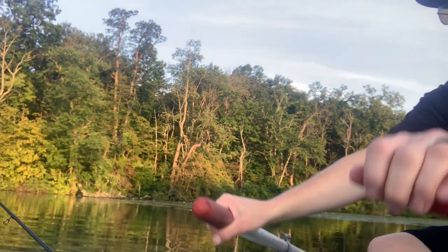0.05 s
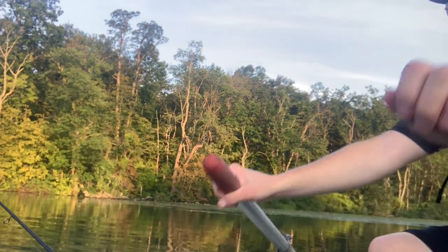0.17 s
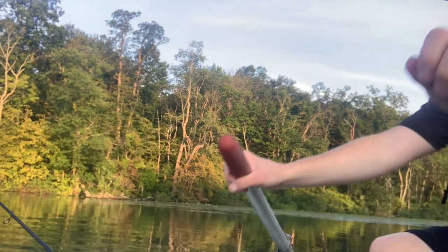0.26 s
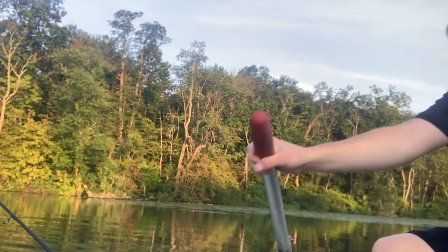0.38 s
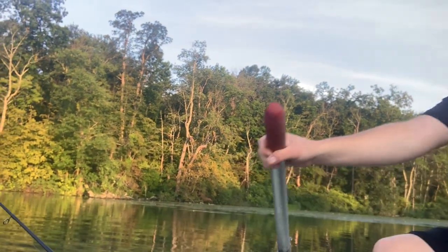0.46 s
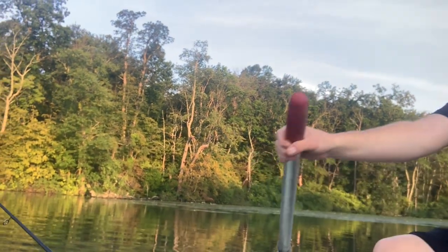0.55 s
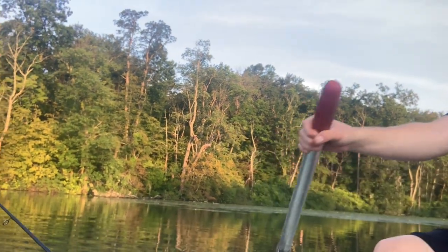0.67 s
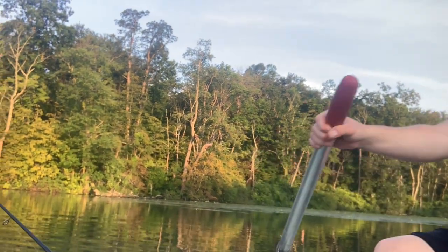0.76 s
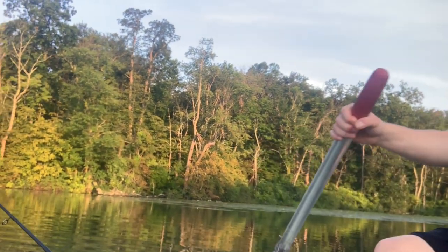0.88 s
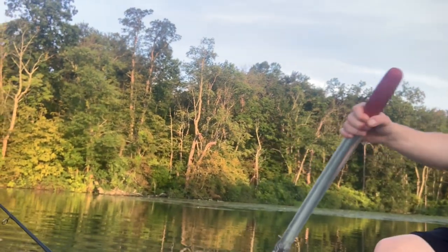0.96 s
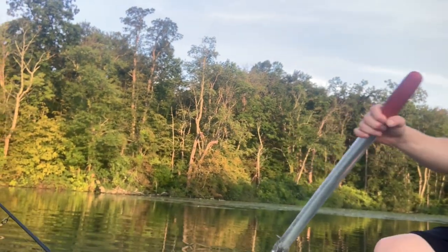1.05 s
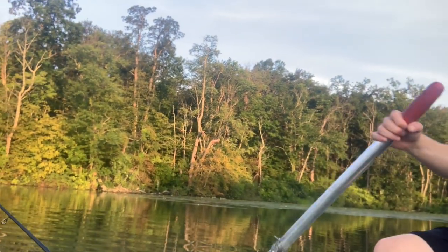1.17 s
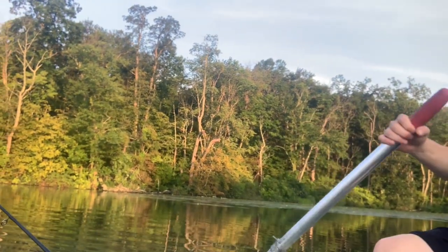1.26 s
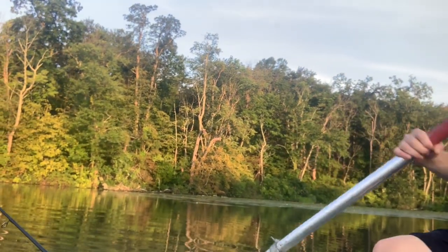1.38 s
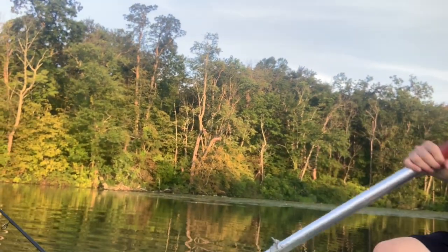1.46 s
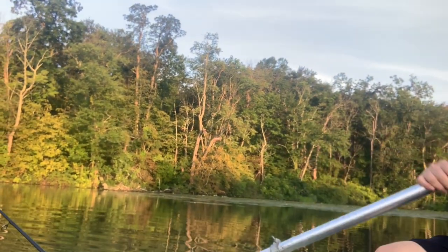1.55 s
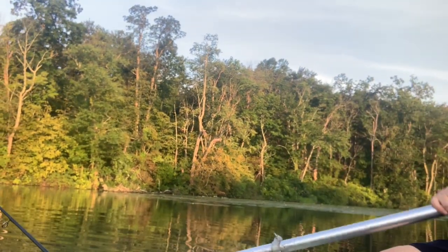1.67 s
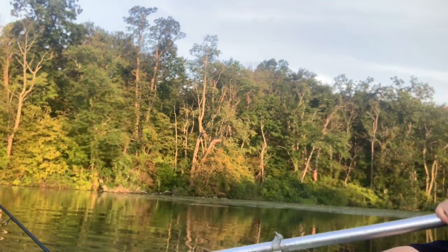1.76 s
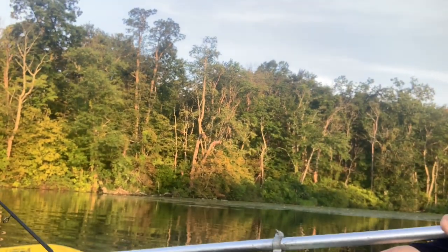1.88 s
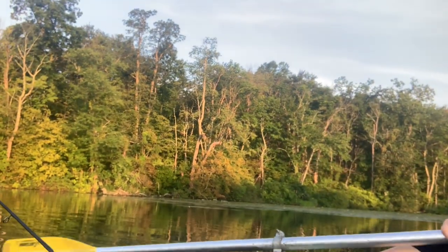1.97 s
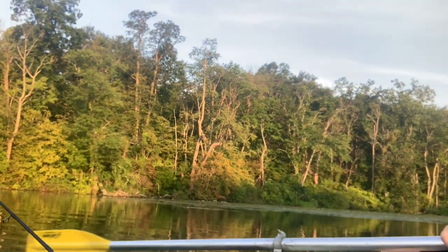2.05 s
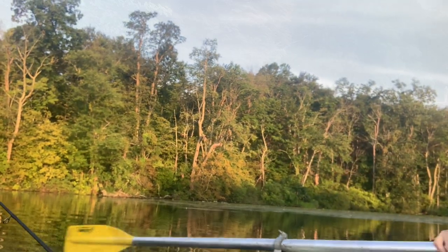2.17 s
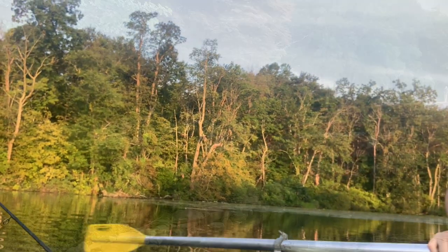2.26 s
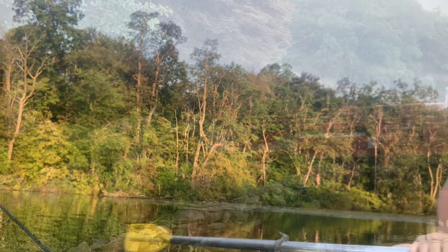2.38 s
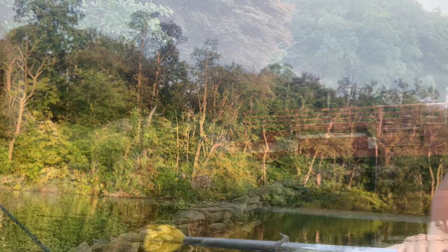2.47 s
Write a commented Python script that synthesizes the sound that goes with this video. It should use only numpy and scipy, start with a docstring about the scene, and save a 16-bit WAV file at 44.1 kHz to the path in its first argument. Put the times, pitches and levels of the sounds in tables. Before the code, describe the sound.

Oars grind and knock in their locks through one stroke, heard from aboard a small boat over a low wash. A light splash and knock come at 0.2 seconds, then dull thumps and a short hollow hull boom at 0.6. Metal fittings clack from 1.2 to 1.6 seconds. The lifted blade drips and trickles from 1.7 to 2, and another knock lands near 2.5. Distant insects hiss faintly throughout.

```python
"""Low wash under a small rowing boat, then one oar stroke, heard from on board on a calm lake.
The oars grind and knock in their locks and set the hollow hull booming. The metal fittings clack
as the stroke ends, then the lifted blade drips, each drop trapping a ringing bubble.
Insects hiss on the shore."""
import sys
import numpy as np
from scipy import signal
from scipy.fft import rfft, irfft, next_fast_len
from scipy.io import wavfile
from scipy.ndimage import map_coordinates

SR = 44100
rng = np.random.default_rng(int(sys.argv[2]) if len(sys.argv) > 2 else 0)


def wrap_up_sound(samples):
    """Save the sound to the file named by the first command line argument, as 16-bit audio."""
    columns = np.atleast_2d(samples).T
    # keep every value between -1 and 1, then stretch to whole-number steps
    tamed = np.clip(columns, -1, 1)
    steps = np.round(tamed * 32767).astype(np.int16)
    wavfile.write(sys.argv[1], SR, steps)


N = 110250  # 2.5 s


def amp(db):
    """Decibels to gain."""
    return 10 ** (np.asarray(db) / 20)


def unit_rms(x):
    """Scale to rms 1."""
    return x / np.sqrt(np.mean(x ** 2) + 1e-20)


def curve_at(points, hz):
    """Interpolate (Hz, value) points on a log frequency axis."""
    point_hz, values = np.transpose(points)
    return np.interp(np.log(hz + 1), np.log(point_hz + 1), values)


def envelope(points):
    """Gain per sample from (s, dB) points."""
    return amp(np.interp(np.arange(N) / SR, *np.transpose(points)))


def filtered(x, response):
    """Apply a gain given as a function of Hz."""
    n = x.shape[-1]
    n_fft = next_fast_len(n + 8192)
    return irfft(rfft(x, n_fft) * response(np.fft.rfftfreq(n_fft, 1 / SR)), n_fft)[..., :n]


def lowpass(x, cut_hz, slope):
    """Zero-phase low-pass, falling 6 * slope dB per octave."""
    return filtered(x, lambda hz: 1 / (1 + (hz / cut_hz) ** slope))


def add(out, start_s, sound):
    """Mix a sound in at start_s."""
    i = max(0, min(N - 1, round(start_s * SR)))
    out[:, i:i + sound.shape[-1]] += sound[..., :N - i]


# Each row: frequency in Hz, left-right coherence from 0 to 1.
COHERENCE = [(60, 0.92), (150, 0.89), (290, 0.81), (640, 0.81), (1400, 0.037), (5500, 0.017), (7500, 0.97),
             (15000, 1)]
def width_rad(hz):
    """Mid-side angle that gives the coherence at hz."""
    return np.arccos(np.clip(curve_at(COHERENCE, hz), -1, 1)) / 2


def spread(pair, spectrum):
    """Colour two unrelated signals and blend them to stereo at rms 1."""
    blend = lambda hz: [np.cos(width_rad(hz)), np.sin(width_rad(hz))]
    mid, side = filtered(pair, lambda hz: amp(curve_at(spectrum, hz)) * blend(hz))
    return unit_rms(np.array([mid + side, mid - side]))


def noise(spectrum, n=N):
    """Coloured stereo noise at rms 1."""
    return spread(rng.standard_normal((2, n)), spectrum)


def ring(modes, t, scatter_db):
    """Struck (Hz, dB, T60 s) modes, each shifted in phase between the ears by up to a quarter cycle."""
    out = np.zeros((2, len(t)))
    for k, (hz, db, t60_s) in enumerate(modes):
        skew_rad = (-1) ** k * width_rad(hz) * np.array([[1], [-1]])
        decay = amp(db + scatter_db * rng.standard_normal() - 60 * t / t60_s)
        out += decay * np.sin(2 * np.pi * hz * t + skew_rad)
    return out


# Each row: frequency in Hz, spectral density in dB.
AIR_SPECTRUM = [(30, -17.5), (200, 7.5), (500, -2), (1000, -11), (2000, -10.5), (4000, -26), (8000, -34.5),
                (16000, -92)]
INSECT_SPECTRUM = [(3000, -59.5), (4500, -29), (5400, 0.5), (6300, 0), (7200, -19.5), (8500, -56.5)]
def shore(air_db=-58, insects_db=-63):
    """Still air and a steady band of distant insects."""
    return amp(air_db) * noise(AIR_SPECTRUM) + amp(insects_db) * noise(INSECT_SPECTRUM)


# Each row: time in seconds, level in dB.
WASH_LEVELS = [(0, -25.5), (.16, -50), (.25, -30), (.35, -45), (.46, -34), (.55, -38.5), (.66, -25.5),
               (.8, -32.5), (.96, -35.5), (1.15, -32), (1.45, -45.5), (1.62, -35), (1.8, -35),
               (1.92, -37.5), (2.1, -33), (2.3, -39.5)]
SPRAY_LEVELS = [(0, -68.5), (.2, -63), (.235, -55), (.3, -63), (.6, -63.5), (.93, -71.5), (1.0, -64),
                (1.45, -64), (1.62, -58), (1.9, -62), (2.05, -65.5), (2.28, -63.5)]
# Each row: frequency in Hz, spectral density in dB.
WASH_SPECTRUM = [(20, -42), (40, -33.5), (62, 4), (90, 3.5), (120, 5), (160, -4), (250, -6), (500, -27.5),
                 (1500, -79)]
SPRAY_SPECTRUM = [(500, -10.5), (2000, -1), (5000, 11), (8200, 0), (11000, -1), (15000, -13)]
def water(wash_db=-2, spray_db=1, grain_db=4):
    """Water rumbles against the hull; grainy spray comes off the blades."""
    droplets = rng.standard_normal((2, N)) * amp(grain_db * rng.standard_normal(N))
    wash = amp(wash_db) * envelope(WASH_LEVELS) * noise(WASH_SPECTRUM)
    spray = amp(spray_db) * envelope(SPRAY_LEVELS) * spread(droplets, SPRAY_SPECTRUM)
    return wash + spray


# Each row: frequency in Hz, spectral density in dB.
CONTACT_SPECTRUM = [(200, -13), (600, 4), (1300, 7.5), (2500, 2), (4000, -3.5), (5800, 2), (8000, -4.5),
                    (11000, -9.5), (15000, -14.5)]
def contact_noise(t):
    """Noise with the spectrum of a short, hard contact."""
    return noise(CONTACT_SPECTRUM, len(t))


def trickle(count=140, start_s=1.65, end_s=1.91, mid_hz=1950, octaves=3.4, floor_db=-58):
    """Fine, uneven run of drops as (s, Hz, dB), most of them faint."""
    return [(start_s + when * (end_s - start_s), mid_hz * 2 ** (octaves * (pitch - .5)),
             floor_db + 12 * strength ** 2)
            for when, pitch, strength in rng.random((count, 3))]


# Each row: start in seconds, length in seconds, middle pitch in Hz, level in dB.
SPLASHES = [(0.189, 0.017, 2590, -53.5), (0.223, 0.016, 2370, -44.5), (1.741, .022, 2005, -49),
            (1.83, .04, 1174, -47), (1.847, 0.074, 5300, -48)]
def splashes(drops_each=18, octaves=0.934):
    """Clusters of small drops as (s, Hz, dB)."""
    return [(start_s + when * length_s, mid_hz * 2 ** (octaves * (pitch - .5)), db + 10 * (strength - .5))
            for start_s, length_s, mid_hz, db in SPLASHES
            for when, pitch, strength in rng.random((drops_each, 3))]


# Each row: start in seconds, bubble pitch in Hz, level in dB.
DROPS = [(.069, 2320, -37.5), (.074, 2270, -35), (0.068, 7150, -39.5), (.233, 1600, -42),
         (.2345, 2730, -42), (.2355, 4320, -38.5), (1.716, 4270, -36), (1.726, 1860, -38.5),
         (1.733, 4100, -40), (1.752, 2080, -34.5), (1.807, 1430, -43), (1.817, 2130, -42.5),
         (1.872, 874, -33), (1.873, 1134, -33), (1.89, 993, -35), (1.895, 1194, -36.5),
         (1.935, 7050, -42.5), (1.967, 1530, -37), (1.992, 3700, -46.5)]
def drips(t60_cycles=27, pitch_rise=0.033, splat_hz=8500, splat_db=-13, splat_s=.003):
    """Each drop off the blades ticks on the water and traps a bubble of rising pitch."""
    out, t = np.zeros((2, N)), np.arange(SR // 10) / SR
    pan_db, max_lag_s = np.array([[4], [-4]]), 3.38e-5
    fine_drops = trickle()
    for start_s, hz, db in DROPS + splashes() + fine_drops:
        lag_s = np.array([[0], [rng.uniform(0, max_lag_s)]])
        age = np.maximum(t - lag_s, 0) * hz / t60_cycles  # 1 at 60 dB down
        phase = 2 * np.pi * t60_cycles * age * (1 + pitch_rise * age / 2)
        bubble = np.sin(phase) * amp(-60 * age) * (1 - np.exp(-age / .07))
        splat = lowpass(contact_noise(t), splat_hz, slope=4) * np.exp(-t / splat_s)
        add(out, start_s, amp(db + pan_db) * (2 * bubble + amp(splat_db) * splat))
    return out


# Keyed by oar. Each row: frequency in Hz, level in dB.
TUBE_MODES = {"near": [(740, 0), (1152, 0), (1285, 0.5), (1380, 4.5), (1935, 4.5), (2800, 2), (5460, -6.5),
              (6020, -4), (6680, -6), (7540, 5.5)], "far": [(1114, -5), (1281, -6), (1385, 3.5), (1830, -4),
              (2540, -2.5), (5330, -1), (5660, -7), (6230, -2), (6730, -6), (7650, -9.5), (8050, -10.5)]}
def oar_tube(oar, t60_at_1khz_s=0.18, damping_power=.8):
    """Modes of an oar tube with its lock as (Hz, dB, T60 s); high ones die first."""
    return [(hz, db, t60_at_1khz_s * (hz / 1000) ** -damping_power) for hz, db in TUBE_MODES[oar]]


# Each row: start in seconds, level in dB, treble shelf in dB, chatter time in seconds, oar.
CLACKS = [(0.224, -40.5, -0.5, 0.025, "far"), (0.481, -53, 10.5, 0.0037, "far"),
          (1.166, -33.5, -11.5, 0.013, "far"), (1.2219, -41, 14, 0.012, "near"),
          (1.2291, -30, -5.5, 0.005, "near"), (1.246, -33.5, -11.5, 0.013, "near"),
          (1.3353, -36.5, -2.5, 0.0069, "far"), (1.477, -48, 5, 0.0051, "far"),
          (1.557, -27, 11.5, 0.003, "far"), (1.561, -35, 12, 0.0038, "far"),
          (1.5659, -30.5, -12, 0.011, "far"), (2.488, -33.5, -12.5, 0.013, "near")]
def oarlock_clacks(ring_db=-7, crack_db=-2, tail_db=-13, tail_s=0.047, tail_hz=2200, shelf_hz=3800):
    """Metal chatters on metal and builds up the tube's ring; the boat answers with a dull tail."""
    out, t = np.zeros((2, N)), np.arange(SR // 4) / SR
    attack = 1 - np.exp(-t / .0008)
    for start_s, db, treble_db, chatter_s, oar in CLACKS:
        crack = amp(crack_db) * contact_noise(t) * np.exp(-(t / chatter_s) ** 2 / 2)
        tail = amp(tail_db) * lowpass(contact_noise(t), tail_hz, slope=4) * np.exp(-t / tail_s)
        build_up = 1 - np.exp(-2 * t / chatter_s)
        clank = amp(ring_db) * ring(oar_tube(oar), t, scatter_db=0.93)[0] * build_up
        hit = (crack + tail) * attack + clank
        shelf = lambda hz: amp(treble_db * hz ** 2 / (hz ** 2 + shelf_hz ** 2))
        add(out, start_s, amp(db) * filtered(hit, shelf))
    return out


# Each row: frequency in Hz, level in dB, T60 in seconds.
HULL_MODES = [(64.6, -27.5, .2), (86, -10.5, 0.14), (117.7, -5, 0.17), (219.76, 6, 0.11), (278, 1, 0.076),
              (424.2, -2.5, 0.12), (506.6, 0.5, 0.069), (558.3, -3, 0.074), (655, -11.5, 0.13),
              (909.4, -21, 0.32)]
# Each row: start in seconds, level in dB, contact cut-off in Hz.
KNOCKS = [(0.2005, -24, 900), (.368, -19, 276), (.402, -19, 273), (0.603, -16, 252), (0.617, -25.5, 592),
          (0.984, -33, 800), (1.048, -30.5, 450), (1.168, -22, 960), (1.573, -27.5, 724),
          (1.709, -24.5, 300), (2.012, -18, 140), (2.439, -36, 1400), (2.491, -20, 1190)]
def hull_knocks(attack_s=0.0008, gain_db=-5):
    """Dull blows of the oar ring the hull; harder ones reach its higher modes."""
    out, t = np.zeros((2, N)), np.arange(SR // 3) / SR
    attack = (1 - np.exp(-t / attack_s)) ** 2
    for start_s, db, cut_hz in KNOCKS:
        modes = [(hz, mode_db - 10 * np.log10(1 + (hz / cut_hz) ** 4), t60_s)
                 for hz, mode_db, t60_s in HULL_MODES]
        add(out, start_s, amp(db + gain_db) * ring(modes, t, scatter_db=1.2) * attack)
    return out


# Oar pressure on the pivot. Each row: time in seconds, level in dB.
PIVOT_LOAD = [(0, -45), (.1, -53.5), (.18, -50), (.2, -30.5), (.31, -46), (.39, -30.5), (.5, -39),
              (.65, -34.5), (.84, -34), (.94, -43), (1.03, -30.5), (1.13, -38), (1.22, -31.5),
              (1.32, -44.5), (1.5, -46.5), (1.58, -32.5), (1.66, -46.5), (1.77, -34), (1.88, -55.5),
              (2.0, -42.5), (2.17, -40.5), (2.25, -94), (2.41, -89.5), (2.5, -22.5)]
# Each row: frequency in Hz, spectral density in dB.
RUB_SPECTRUM = [(60, -39), (150, -4.5), (225, 5), (300, 6), (430, -2.5), (560, -2.5), (720, -9),
                (1300, -14.5), (1800, -26), (3000, -28), (5000, -38), (9000, -57)]
def pivot_grind(slips_per_s=900, hull_db=-3, rub_db=-4.5, metal_db=-23):
    """The pivot sticks and slips unevenly, shaking the hull and the oar tubes."""
    t = np.arange(SR // 4) / SR
    slips = (rng.random(N) < slips_per_s / SR) * rng.choice([-1, 1], (2, N))

    def shaken(modes):
        response = ring(modes, t, scatter_db=0)
        return unit_rms(signal.fftconvolve(slips[:1], response, axes=1)[:, :N])

    tubes = shaken(oar_tube("near") + oar_tube("far"))[0]
    metal = amp(metal_db) * lowpass(tubes, cut_hz=2500, slope=2)
    rub = amp(rub_db) * spread(slips, RUB_SPECTRUM)
    hull = amp(hull_db) * shaken(HULL_MODES)
    return envelope(PIVOT_LOAD) * (rub + hull + metal)


# Each row: start in seconds, length in seconds, pitch in Hz, level in dB.
GROANS = [(0.334, 0.011, 549, -34.5), (0.618, 0.04, 223.4, -11), (.682, 0.039, 225.7, -23.5),
          (.74, 0.043, 232, -29), (1.04, 0.034, 223.7, -31), (1.161, 0.05, 226.5, -29),
          (1.749, 0.038, 110.1, -26.5), (2.32, 0.084, 119, -31)]
def hull_groans(rise_s=.007, release_s=0.012, waver=0.007, drift_per_s=60, overtone_db=-32):
    """The loaded oar judders at a hull mode, giving short, nearly pure booms."""
    out, t = np.zeros((2, N)), np.arange(SR // 4) / SR
    for start_s, length_s, hz, db in GROANS:
        drift = map_coordinates(rng.standard_normal(32), [t * drift_per_s], mode="nearest")
        phase = 2 * np.pi * np.cumsum(hz * (1 + waver * drift)) / SR
        swell = (1 - np.exp(-t / rise_s)) * np.exp(-np.maximum(t - length_s, 0) / release_s)
        tone = np.sin(phase) + amp(overtone_db) * np.sin(2 * phase)
        add(out, start_s, amp(db) * swell * tone)
    return out


# Each row: frequency in Hz, left minus right level in dB.
BOAT_BALANCE = [(60, 1), (120, 3), (220, 1.5), (400, 0.5), (1300, 1.4), (4400, 1.5), (12000, -0.5)]
def scene(left_lead_s=.00026):
    """Boat, drips and shore; all reach the left ear first, and the boat's bass leans left."""
    sides = np.array([[.5], [-.5]])
    boat = pivot_grind() + hull_knocks() + hull_groans() + oarlock_clacks() + water()
    boat = filtered(boat, lambda hz: amp(curve_at(BOAT_BALANCE, hz) * sides))
    mix = boat + drips() + shore()
    return filtered(mix, lambda hz: np.exp(2j * np.pi * hz * left_lead_s * sides))


def record(dry, low_cut_hz=46, order=3, top_hz=15800):
    """Thin the deep bass and cut the treble steeply at top_hz."""
    highpass = signal.butter(order, low_cut_hz, "highpass", fs=SR, output="sos")
    return lowpass(signal.sosfilt(highpass, dry), top_hz, slope=120)


dry = scene()
out = record(dry)
wrap_up_sound(out)
```